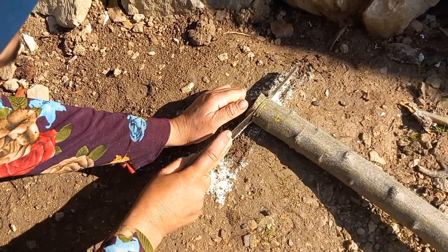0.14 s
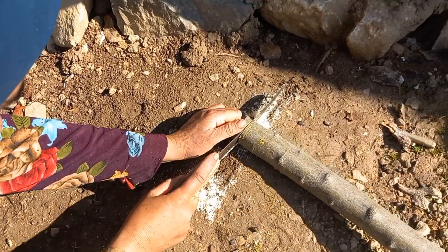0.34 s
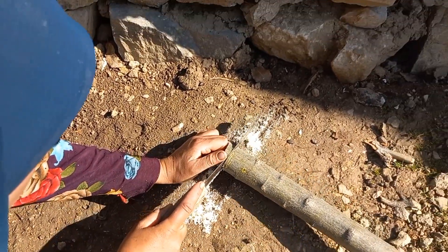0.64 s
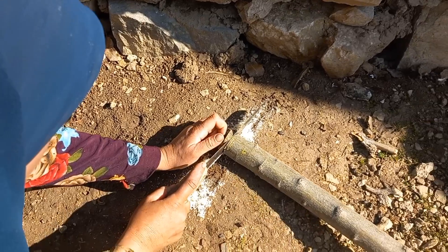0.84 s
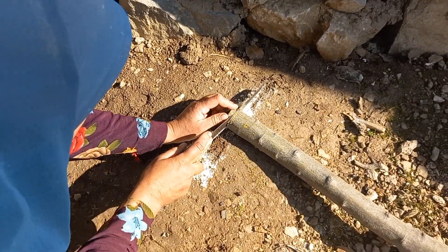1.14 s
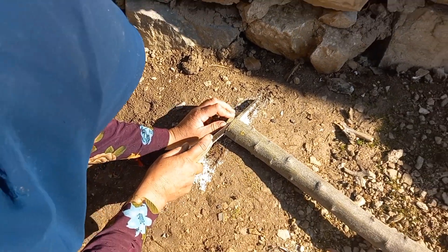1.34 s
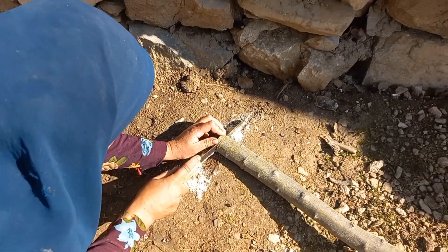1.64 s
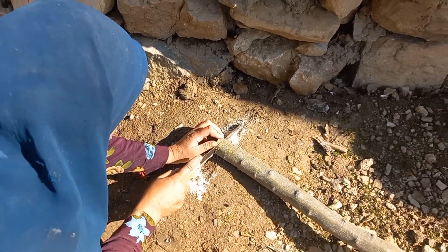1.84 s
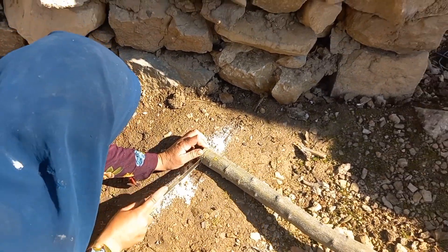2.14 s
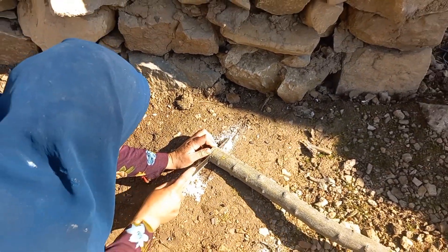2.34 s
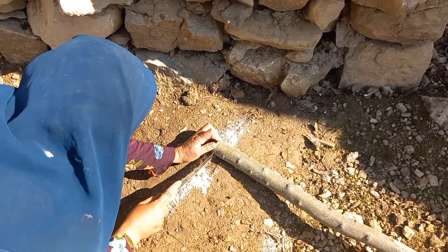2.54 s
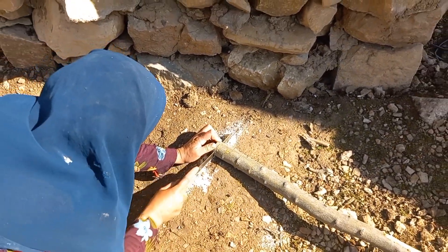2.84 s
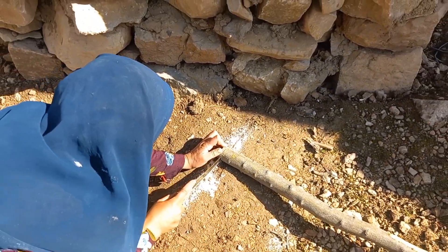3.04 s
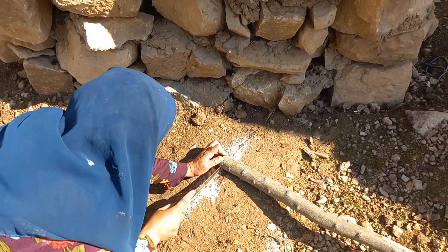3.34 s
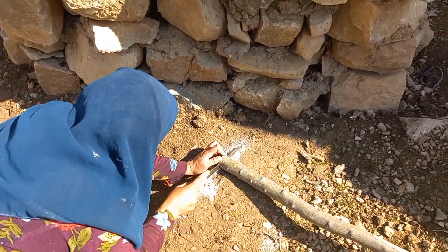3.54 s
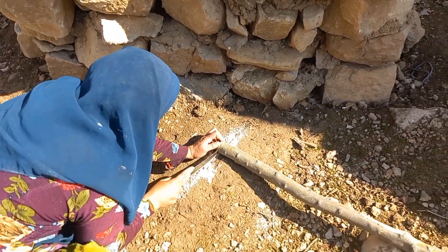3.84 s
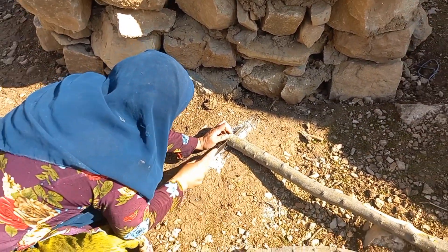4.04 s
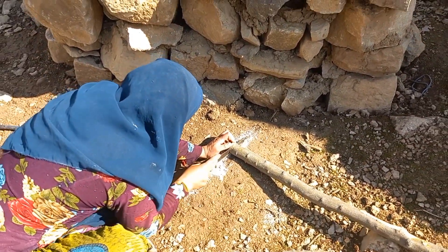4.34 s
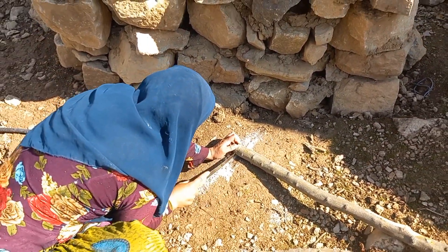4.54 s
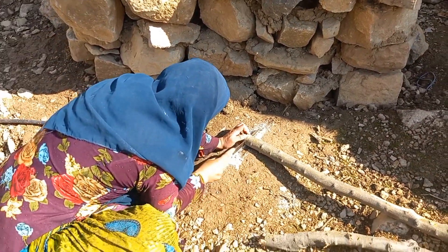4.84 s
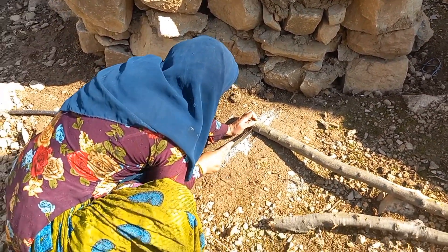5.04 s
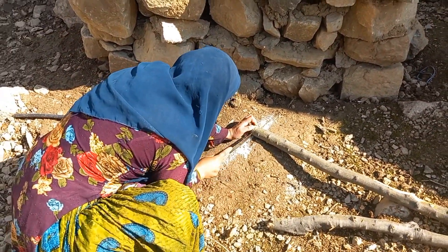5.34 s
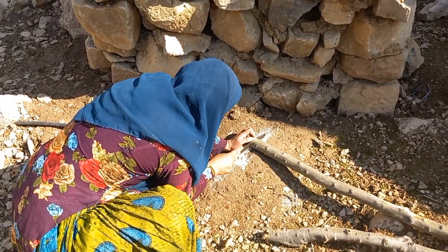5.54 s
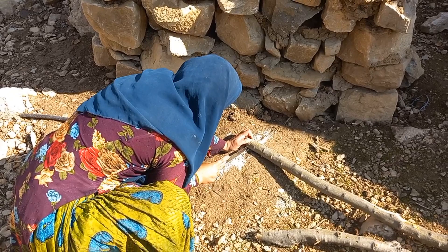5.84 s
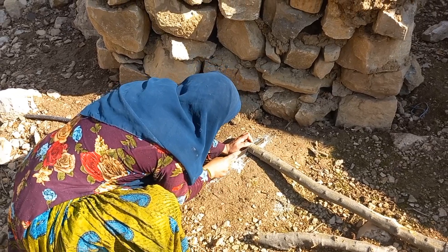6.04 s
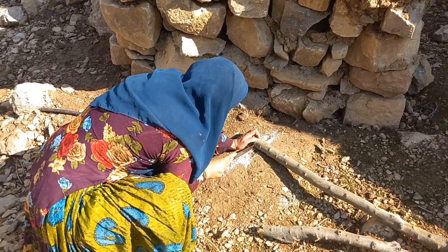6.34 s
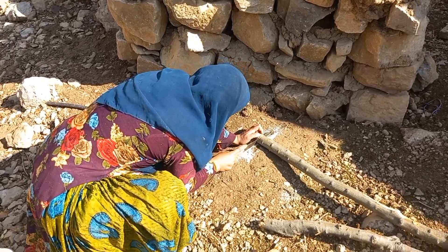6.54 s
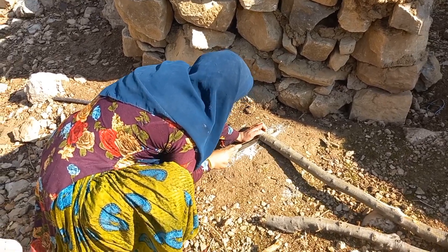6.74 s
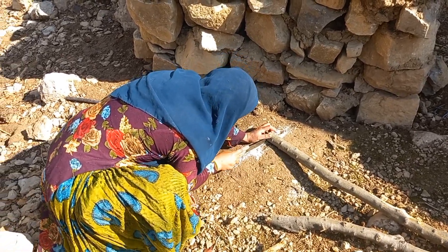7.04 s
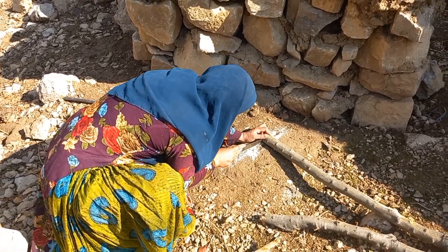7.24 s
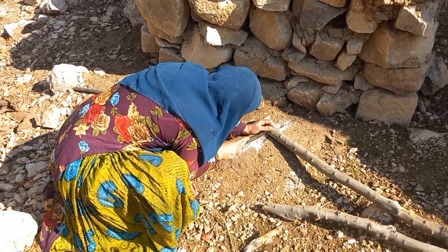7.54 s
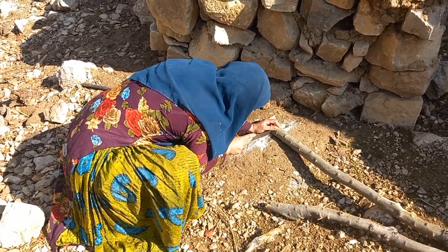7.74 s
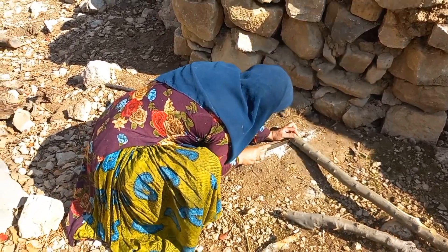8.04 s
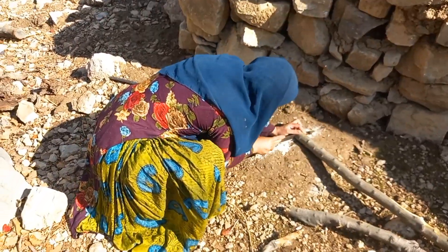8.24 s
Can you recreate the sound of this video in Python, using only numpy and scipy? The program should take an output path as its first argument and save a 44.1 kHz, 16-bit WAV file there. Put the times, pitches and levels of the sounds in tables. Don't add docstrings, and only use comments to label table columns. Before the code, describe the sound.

From 0 to 2 seconds there is mostly faint open-air hiss and a distant low murmur, with two soft branch bumps at the start, a light scrape, sparse bright grit ticks and a dull knock with clicks around 1.5. A sharp tick near 2.08 begins the sawing: full cutting rasps about every 0.4 seconds, with quieter return rasps between them. The sound is dry, gritty and hollow, with a low wavering hum of teeth drumming through the branch. The blade squeals briefly near 2.5 and 4.1; a hard crack marks 4.5. Low wind puffs bump the microphone around 3.6 to 4.3. Strokes soften from 5.7 and stop by about 6.7. A near-silent pause follows with a few ticks, then at 7.7 to 7.85 a scrape, crisp clicks and the hardest low knock. Weaker sawing resumes until the abrupt end at about 8.4.

```python
import sys
import numpy as np
from scipy import signal
from scipy.fft import rfft, irfft, next_fast_len
from scipy.io import wavfile
from scipy.ndimage import uniform_filter1d

SR = 44100
rng = np.random.default_rng(int(sys.argv[2]) if len(sys.argv) > 2 else 0)


def unload_audio(sound):
    columns = np.transpose(np.atleast_2d(sound))
    steps = np.round(np.clip(columns, -1, 1) * 32767)
    wavfile.write(sys.argv[1], SR, steps.astype(np.int16))


def ratio_of_db(decibels):
    return 10 ** (np.asarray(decibels, float) / 20)


N = 369999

# bite_s, ease_s, rasp_at_bite_db, rasp_at_ease_db, branch_above_blade_db
CUT_STROKES = [(2.105, 2.154, -38.5, -41, -2.5), (2.499, 2.551, -32.5, -37.5, -7),
               (2.874, 2.934, -35.5, -34.5, -7), (3.264, 3.33, -38.5, -38, -5),
               (3.678, 3.738, -39, -35, -5.5), (4.095, 4.163, -38, -39, -6), (4.5, 4.562, -33.5, -39, -8.5),
               (4.884, 4.952, -37.5, -39, -6), (5.298, 5.351, -35, -36.5, -8),
               (5.69, 5.755, -44, -39, -5.5), (6.157, 6.225, -43.5, -43.5, -5.5),
               (6.591, 6.657, -46.5, -46.5, -4), (8.008, 8.075, -48, -44.5, -3),
               (8.4, 8.414, -40, -42.5, -8)]
# bite_s, ease_s, rasp_at_bite_db, rasp_at_ease_db, branch_above_blade_db
RETURN_STROKES = [(2.303, 2.408, -52, -45, 2), (2.715, 2.785, -46.5, -45.5, 3),
                  (3.111, 3.177, -44.5, -43.5, -2), (3.527, 3.585, -45, -44, -6.5),
                  (3.915, 3.999, -47.5, -44, -16.5), (4.328, 4.401, -45.5, -43.5, -14),
                  (4.654, 4.784, -52, -42, -5.5), (5.121, 5.19, -47.5, -40.5, -4.5),
                  (5.531, 5.59, -46.5, -42.5, -9.5), (5.999, 6.052, -49, -46, -6.5),
                  (6.406, 6.481, -57, -42, -11.5), (7.858, 7.89, -48.4, -53.5, -11.5),
                  (8.26, 8.302, -51, -46.5, -3.5)]


def saw():
    # hz, level_db_per_hz
    blade_colour = [(1530, -47), (2600, -2.5), (3720, -1), (4100, 0.5), (5190, -3), (6190, 1), (6990, 5),
                    (8910, -10.5), (13300, -4), (15200, -9.5), (16000, -28)]
    # hz, level_db_per_hz
    kerf_colour = [(470, -33), (800, -12.5), (1320, 2), (1620, 0), (2130, -2.5), (3300, -15.5), (4290, -48),
                   (7260, -120)]
    # hz, level_db_per_hz
    wood_colour = [(180, -29.5), (270, 7), (340, 3.5), (400, -4), (480, 0), (750, -11), (950, -4),
                   (1250, -26.5), (2000, -84.5)]
    # centre_hz, width_hz, level_db
    ring_modes = [(429, 94, -8), (565, 74, -2.5), (669.6, 47, 3), (1308, 22, -14.5), (2147, 61, 4.5),
                  (2420, 130, -5), (3140, 39, -6.5), (4450, 320, -4.5), (4260, 80, 6.5), (6100, 220, 4.5),
                  (6800, 150, -16)]
    # centre_hz, width_hz, level_db
    bending_modes = [(99, 5.9, -12), (161.8, 31.5, 2), (209, 109, -1.5)]

    cut_power = swelled(CUT_STROKES, rise=0.046, fall=0.042, bend=0.75)
    return_power = swelled(RETURN_STROKES, rise=0.1, fall=0.054, bend=0.49)
    bite = np.sqrt(cut_power + return_power)
    kerf_db, wood_db = stroke_colours()
    tear = torn_fibres()

    def through(colour, ring_share):
        return evened(shaped(tear, lambda hz: ratio_of_db(read(colour, hz)) * (1 + ring_share * rings(ring_modes, hz))))

    blade = through(blade_colour, 0.22)
    kerf = through(kerf_colour, 1.0)
    wood = through(wood_colour, 3.2)

    rasping = bite + ratio_of_db(-22.5) * lingering(bite, 0.028)
    rasp = rasping * (ratio_of_db(1.88) * blade + ratio_of_db(kerf_db - 0.16) * kerf)
    rasp = rasp + ratio_of_db(wood_db - 1.0) * lingering(bite, 0.0076) * wood
    shake = bite * ratio_of_db(1.65 * wood_db) * tear[0]
    thud = ratio_of_db(20.5) * shaped(shake, lambda hz: rings(bending_modes, hz) ** 2)
    branch = drumming() + thud
    return ports(rasp[0] + branch, rasp[1] + branch)


def torn_fibres():
    snaps_per_s = 2500
    snaps = ratio_of_db(2.4 * np.minimum(rng.exponential(1, N), 5)) * (rng.random(N) < snaps_per_s / SR)
    grit = signal.lfilter([1], [1, -0.9], snaps)
    roughness = evened((2.7 + grit) * ratio_of_db(1.1 * wobble(0.01)[0]))
    return patchy(roughness * rng.standard_normal((2, N)), patch_db=2.56)


def patchy(x, patch_db):
    z = signal.stft(x, nperseg=512, noverlap=384)[2]
    field = rng.standard_normal(z.shape[1:])
    field = uniform_filter1d(field, size=2, axis=0)
    field = evened(uniform_filter1d(field, size=12, axis=1))
    return signal.istft(z * ratio_of_db(patch_db * field), nperseg=512, noverlap=384)[1][:, :N]


def swelled(strokes, rise, fall, bend):
    t, power = np.arange(N) / SR, np.zeros(N)
    for bite, ease, bite_db, ease_db, _ in strokes:
        part = slice(round((bite - rise) * SR), round((ease + fall) * SR))
        corners_s = [bite - rise, bite, ease, ease + fall]
        heights = [0, ratio_of_db(bend * bite_db), ratio_of_db(bend * ease_db), 0]
        power[part] += np.interp(t[part], corners_s, heights) ** (2 / bend)
    return power


def stroke_colours():
    rows = []
    for strokes, kerf_db, deepens_db_per_s in (CUT_STROKES, -5.5, 1.01), (RETURN_STROKES, -9.5, 0.59):
        for bite, ease, _, _, wood_db in strokes:
            rows.append(((bite + ease) / 2, kerf_db + deepens_db_per_s * bite, wood_db))
    return follow(sorted(rows))


def drumming():
    # start_s, stop_s, mid_stroke_teeth_hz, level_db
    tooth_runs = [(2.071, 2.205, 154.8, -39), (2.308, 2.451, 189.4, -37.5), (2.452, 2.589, 157.7, -40.5),
                  (2.69, 2.835, 203.3, -33.5), (2.821, 2.928, 151, -45), (3.085, 3.225, 221.4, -40.5),
                  (3.211, 3.306, 165.5, -56), (3.5, 3.644, 202, -35), (3.621, 3.77, 161.5, -44.5),
                  (3.91, 4.051, 210.3, -37.5), (4.117, 4.207, 131.3, -38), (4.315, 4.445, 219.3, -40.5),
                  (4.431, 4.617, 154.6, -44.5), (4.686, 4.835, 225.8, -43.5), (4.825, 4.978, 167.6, -47.5),
                  (5.09, 5.24, 213.8, -47.5), (5.26, 5.421, 176, -62), (5.52, 5.67, 180, -49),
                  (5.66, 5.83, 166.2, -52), (5.951, 6.105, 197.7, -44), (6.134, 6.272, 192.3, -54),
                  (6.41, 6.53, 177.7, -41.5), (6.598, 6.706, 191, -48), (7.823, 7.922, 174.8, -44),
                  (7.993, 8.149, 193.6, -50), (8.214, 8.334, 185.4, -39), (8.354, 8.403, 164, -50.5)]
    arm_speed = [(.94, .96), (.74, .62)]
    # multiple, level_db
    overtones = [(2, -25.5), (3, -37), (4, -40)]

    out = np.zeros(N + SR)
    drift, beat, overtone_beat = wobble(0.011, channels=3)
    for k, (start, stop, mid_hz, db) in enumerate(tooth_runs):
        arch_hz = mid_hz * np.insert(arm_speed[k % 2], 1, 1)
        at = round((start - 0.015) * SR)
        u = np.linspace(0, 1, round((stop - start + 0.035) * SR))[:N - at]
        part = slice(at, at + len(u))
        tooth_hz = np.polyval(np.polyfit([0, 0.5, 1], arch_hz, 2), u)
        turns = np.cumsum(tooth_hz * (1 + 0.035 * drift[part])) / SR
        beat_db = 1.2 + 0.36 * start
        tone = np.sin(2 * np.pi * turns) * ratio_of_db(beat_db * beat[part])
        for multiple, share_db in overtones:
            tone += ratio_of_db(share_db + 4.5 * overtone_beat[part]) * np.sin(2 * np.pi * multiple * turns)
        out[part] += np.sqrt(2) * ratio_of_db(db + 0.5) * np.sin(np.pi * u) ** 1.01 * tone
    return out[:N]


def ports(near, other):
    # hz, likeness
    likeness = [(200, 1), (700, 0.83), (1500, 0.48), (3000, 0.18), (6000, 0.29), (15000, 0.22)]
    # hz, lead_radians
    left_lead = [(100, 0), (950, .3), (1550, 2.4), (2150, -.2), (3100, -1.5), (4310, .2), (5430, -1.1),
                 (7060, 4), (15200, 20)]
    # hz, left_minus_right_db
    side_tilt = [(60, -6.5), (110, -2), (200, -1), (380, -1), (700, 4.5), (1290, 4), (2380, 5), (4400, -3),
                 (8120, -5), (15000, 2)]

    def same(hz):
        return np.clip(read(likeness, hz), 0, 1)

    right = shaped(near, lambda hz: same(hz) * np.exp(-1j * read(left_lead, hz)))
    right = right + shaped(other, lambda hz: np.sqrt(1 - same(hz) ** 2))
    return shaped(np.array([near, right]), lambda hz: ratio_of_db(np.outer([0.5, -0.5], read(side_tilt, hz))))


def knocks():
    # start_s, level_db
    bumps = [
        (0.012, -53.5),
        (0.086, -55),
        (1.529, -46.5),
        (2.034, -49),
        (6.824, -62),
        (7.798, -42),
    ]
    bend_hz, t60_s, rise_s = 141.5, 0.12, 0.0065
    out, t = np.zeros(N), np.arange(round(0.2 * SR)) / SR
    bump = np.sin(2 * np.pi * bend_hz * t) * ratio_of_db(-60 * t / t60_s) * np.minimum(t / rise_s, 1)
    for s, db in bumps:
        out[round(s * SR):][:len(t)] += np.sqrt(2) * ratio_of_db(db) * bump
    return out


def gravel():
    # start_s, length_s, level_db, centre_hz, width_hz
    scuffs = [
        (0.0, 0.034, -64, 1840, 3020),
        (.232, 0.13, -59, 840, 560),
        (2.028, 0.035, -54.5, 500, 1200),
        (1.518, 0.062, -61, 1620, 3020),
        (2.242, 0.017, -54.5, 970, 3000),
        (6.822, 0.029, -60, 1720, 3000),
        (7.652, 0.056, -59.5, 1200, 3060),
    ]
    # start_s, length_s, level_db, centre_hz, width_hz
    binds = [
        (2.49, 0.061, -32.5, 3760, 900),
        (4.08, 0.064, -36, 2150, 500),
        (6.44, 0.042, -42, 4360, 400),
    ]

    out = np.zeros((2, N))
    crunch = rng.standard_normal((2, N)) * ratio_of_db(1.85 * wobble(0.0024))
    for rows, peak, in_db, out_db in (scuffs, 0.12, -22, -8), (binds, 0.48, -13, -16):
        for start, length, db, hz, width in rows:
            part = slice(round(start * SR), round((start + length) * SR))
            u = np.linspace(0, 1, part.stop - part.start)
            ring = resonate(crunch[:, part], hz + 0 * u, width)
            ring = evened(resonate(ring, hz + 0 * u, width))
            swell_db = np.interp(u, [0, peak, 1], [in_db, 0, out_db])
            out[:, part] += ratio_of_db(db + 3.5 + swell_db) * ring
    return out


def ticks():
    # start_s, peak_db, centre_hz, t60_s
    cracks = [(0.259, -50.5, 6850, 0.029), (0.3022, -50, 4070, 0.024), (0.415, -43, 6350, 0.01),
              (0.505, -56, 6220, 0.025), (0.914, -48, 5540, 0.028), (1.2815, -51, 6400, 0.02),
              (1.34, -38.5, 5740, 0.012), (1.5242, -39, 6360, 0.063), (1.5345, -44, 2580, 0.046),
              (1.9654, -51, 6550, 0.022), (2.034, -40.5, 3530, 0.072), (2.0775, -28.5, 7640, 0.03),
              (2.2453, -44, 6640, 0.015), (2.847, -41, 4980, .02), (4.502, -19, 3140, 0.068),
              (5.9315, -42.5, 6440, 0.025), (6.346, -41.5, 7060, 0.021), (6.825, -42, 6950, 0.041),
              (7.271, -57, 6760, 0.041), (7.657, -47, 2000, 0.027), (7.727, -44.5, 6600, 0.022),
              (7.7724, -31, 6800, 0.057), (7.8336, -31.5, 4345, 0.014), (7.8434, -30, 6800, 0.021),
              (8.299, -33.5, 6300, 0.057)]
    out, t = np.zeros((2, N + 4000)), np.arange(4000) / SR
    noise = rng.standard_normal((len(cracks), 3, 4000))
    for (s, db, hz, t60), (shared, left, right) in zip(cracks, noise):
        crack = np.array([shared + 0.24 * left, shared + 0.25 * right])
        ring = resonate(crack, hz + 0 * t, 1700)
        crack = 0.093 * np.diff(crack, prepend=0) + 0.054 * crack + 3.23 * ring
        fade = ratio_of_db(db - 10.5 - 60 * t / max(t60, 0.003)) * np.minimum(t / 0.00044, 1)
        at = round(s * SR)
        out[:, at:at + 4000] += crack * fade * ratio_of_db([[-3], [3]])
    return out[:, :N]


def wind():
    # hz, level_db_per_hz
    gust_colour = [(15, -48), (25, -39.5), (75, 7), (120, 5), (160, -0.5), (239, -17.5), (389, -30),
                   (500, -36.5), (650, -44), (1100, -120)]
    # start_s, hold_s, level_db, left_minus_right_db
    puffs = [
        (0.518, 0.026, -75, 13),
        (0.859, 0.031, -59.5, -22),
        (1.488, 0.042, -62, -19),
        (3.17, 0.2, -58, 4),
        (3.57, 0.32, -52, 5.5),
        (3.916, 0.068, -41.5, 7.5),
        (4.046, .17, -38.5, -6),
        (4.25, 0.19, -57.5, 19),
        (7.21, .01, -90, 3),
        (7.673, .01, -75, 4),
    ]
    calm_db = -85.5
    level = ratio_of_db(calm_db)
    for start, hold, db, pan_db in puffs:
        puff_db = db + peaked(start, hold, rise=500, fall=382.5)
        level = level + ratio_of_db(puff_db) * ratio_of_db([[pan_db / 2], [-pan_db / 2]])
    rumble = evened(shaped(rng.standard_normal((2, N)), lambda hz: ratio_of_db(read(gust_colour, hz))))
    lumps = ratio_of_db(3.5 * wobble(0.03, channels=2))
    return ratio_of_db(5.0) * level * rumble * lumps


def air():
    # time_s, level_db
    breeze = [(0.0, -75), (0.36, -73), (1.02, -68), (2.03, -68.5), (6.74, -73.5), (7.086, -80), (7.66, -66),
              (7.77, -68.5)]
    # hz, level_db_per_hz
    hiss_colour = [(290, -30), (500, -6.5), (1340, -5.5), (1740, -7), (4090, -3), (7310, -2.5),
                   (9090, -13.5), (14700, -17), (16000, -7.5)]
    # centre_hz, width_hz, level_db
    murmur_modes = [(176.4, 220, 8), (306, 190, -13)]

    hiss_db, = follow(breeze)
    murmur_db = -83.5 + 0.5 * (hiss_db - hiss_db[0]) + 0.94 * np.arange(N) / SR
    hiss = evened(shaped(rng.standard_normal((2, N)), lambda hz: ratio_of_db(read(hiss_colour, hz))))
    murmur = evened(shaped(rng.standard_normal((2, N)), lambda hz: rings(murmur_modes, hz)))
    flicker = ratio_of_db(0.68 * wobble(0.02, channels=2))
    return flicker * (ratio_of_db(hiss_db + 3.5) * hiss + ratio_of_db(murmur_db + 6.5) * murmur)


def evened(x):
    return x / np.sqrt(np.mean(x ** 2) + 1e-20)


def read(points, hz):
    f, value = np.transpose(points)
    return np.interp(np.log(hz + 1), np.log(f + 1), value)


def follow(rows):
    s, *columns = np.transpose(rows)
    return [np.interp(np.arange(N) / SR, s, c) for c in columns]


def shaped(x, gain):
    size = next_fast_len(N)
    return irfft(rfft(x, size) * gain(np.fft.rfftfreq(size, 1 / SR)), size)[..., :N]


def rings(modes, hz):
    return sum(ratio_of_db(db) / (1 + 2j * (hz - f) / width) for f, width, db in modes)


def resonate(x, hz, width):
    turn = np.exp(2j * np.pi * np.cumsum(hz) / SR)
    r = np.exp(-np.pi * width / SR)
    return 2 * (turn * signal.lfilter([1 - r], [1, -r], x / turn)).real


def wobble(seconds, channels=1):
    size = max(round(seconds * SR), 1)
    smooth = uniform_filter1d(rng.standard_normal((channels, N)), size)
    return evened(uniform_filter1d(smooth, size))


def lingering(level, seconds):
    r = np.exp(-1 / (seconds * SR))
    return np.sqrt(signal.lfilter([1 - r], [1, -r], level ** 2))


def peaked(start, hold, rise, fall):
    t = np.arange(N) / SR
    return np.minimum(np.minimum(rise * (t - start), fall * (start + hold - t)), 0)


def scene():
    return saw() + knocks() + gravel() + ticks() + wind() + air()


def low_pass(x):
    return signal.sosfilt(signal.butter(12, 16450, fs=SR, output="sos"), x)


def record(dry):
    def microphone(hz):
        bass_cut = hz ** 2 / (hz ** 2 + 42.0 ** 2)
        return bass_cut / (1 + (hz / 15900) ** 80)

    return low_pass(shaped(dry, microphone))


dry = scene()
out = record(dry)
unload_audio(out)
```